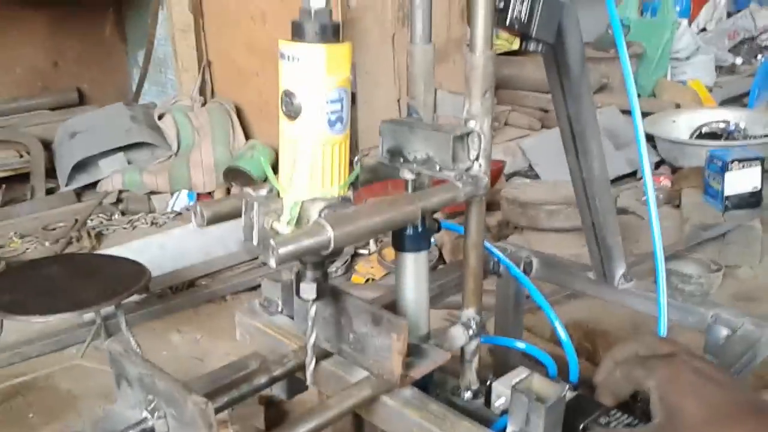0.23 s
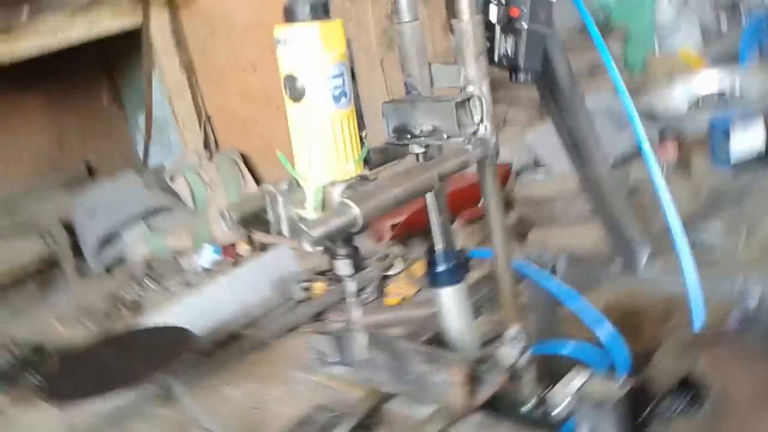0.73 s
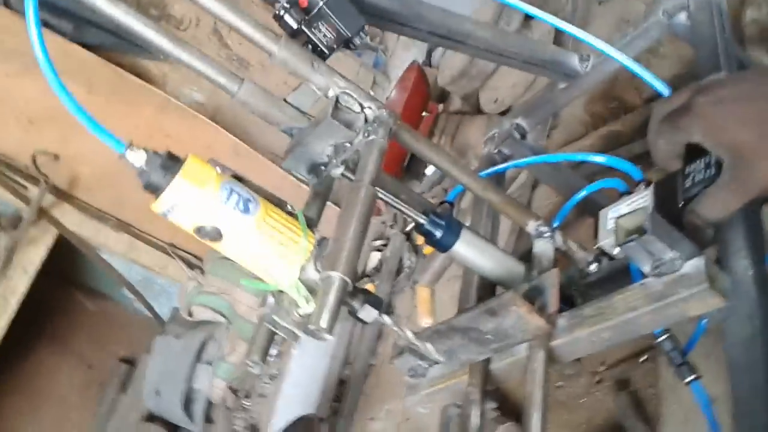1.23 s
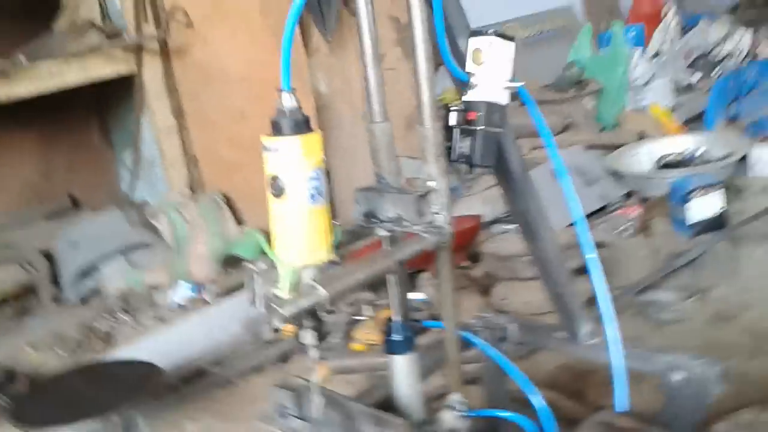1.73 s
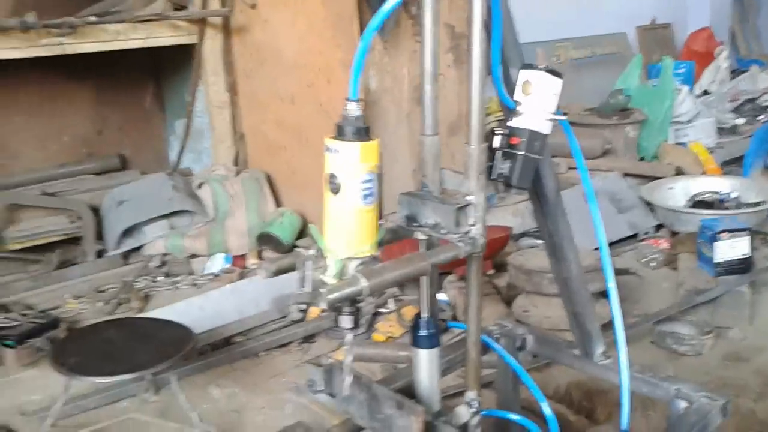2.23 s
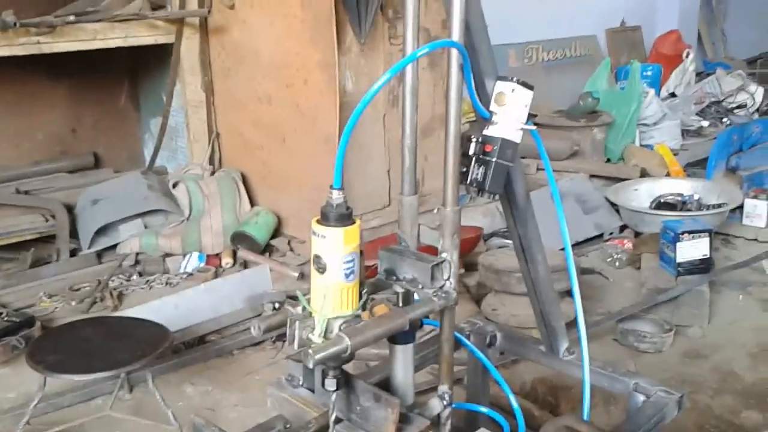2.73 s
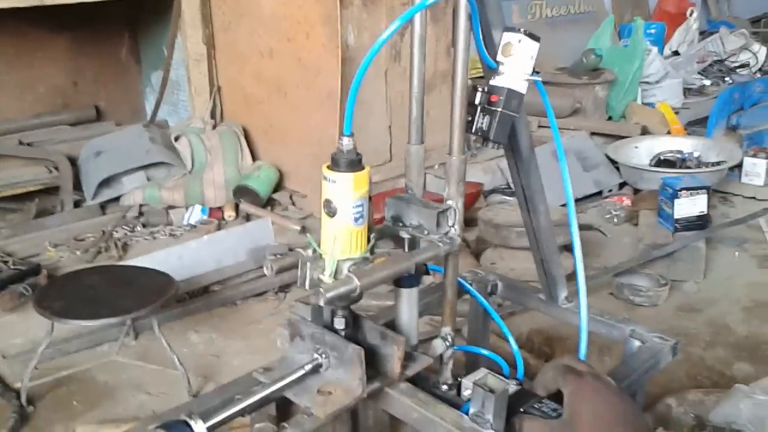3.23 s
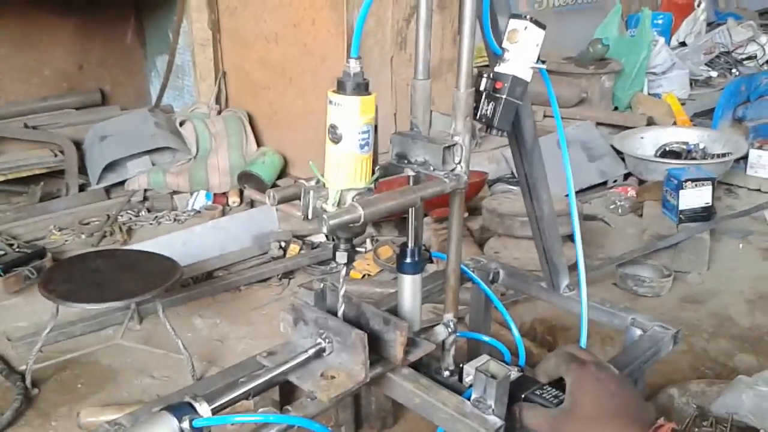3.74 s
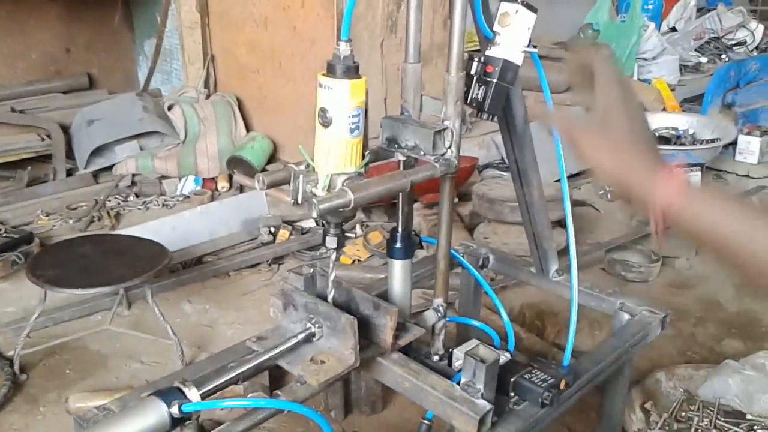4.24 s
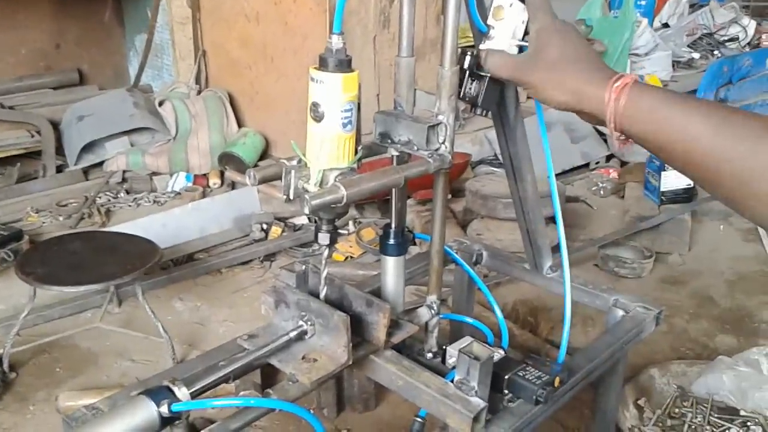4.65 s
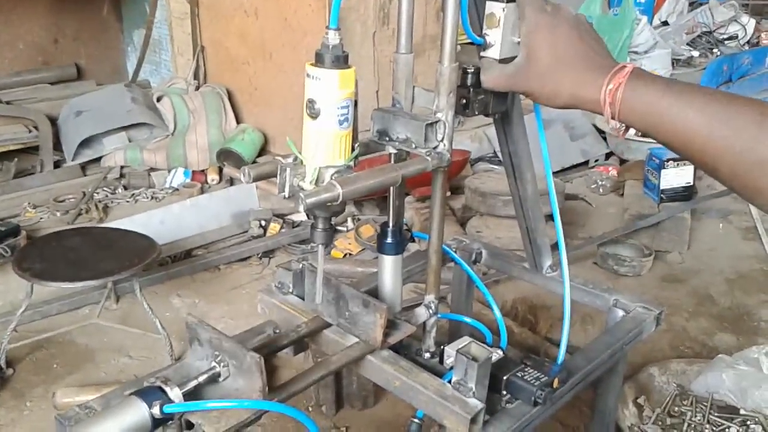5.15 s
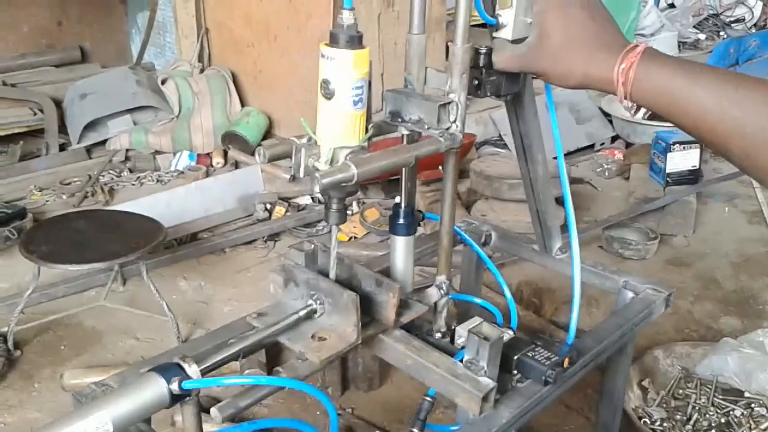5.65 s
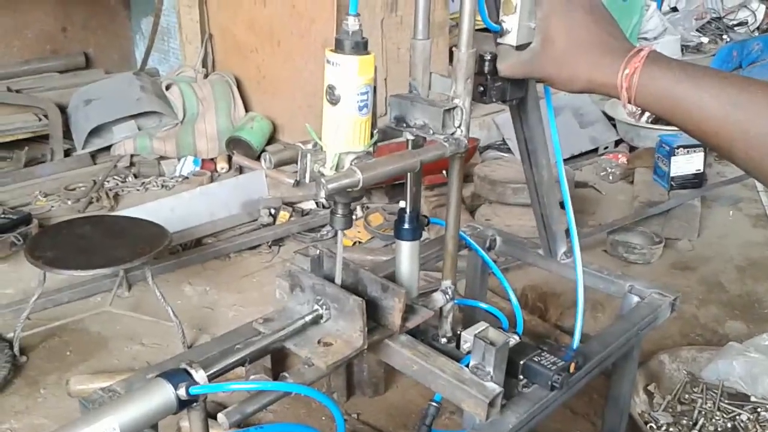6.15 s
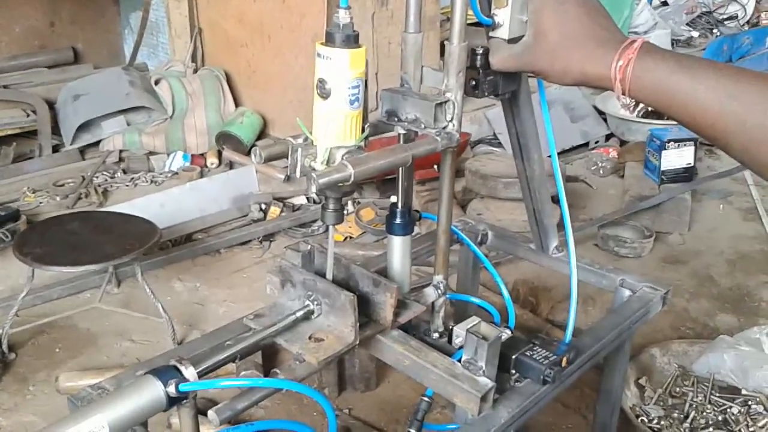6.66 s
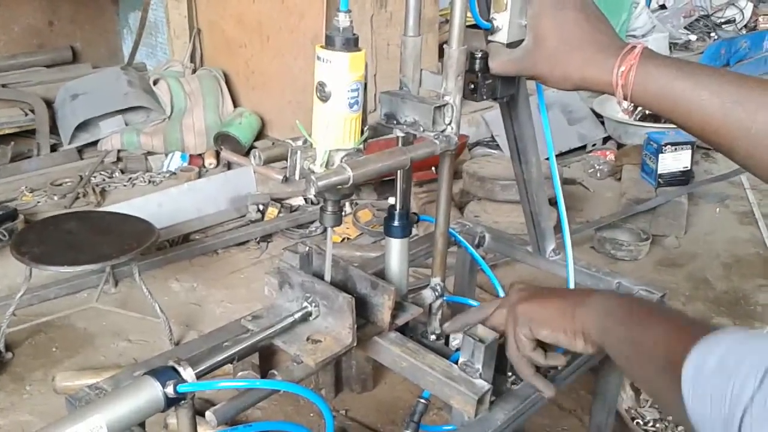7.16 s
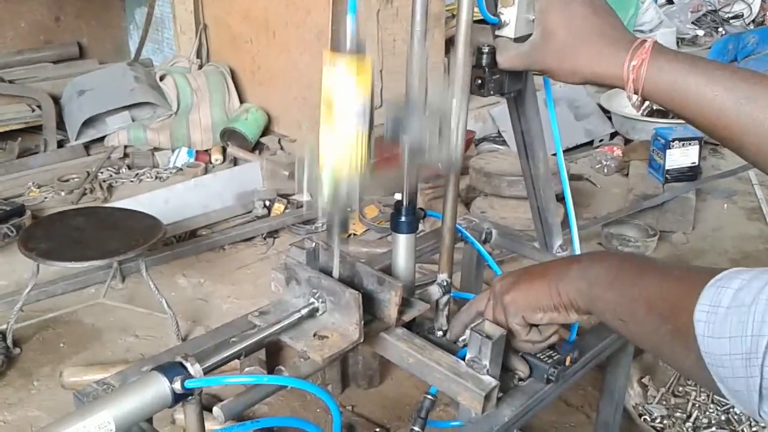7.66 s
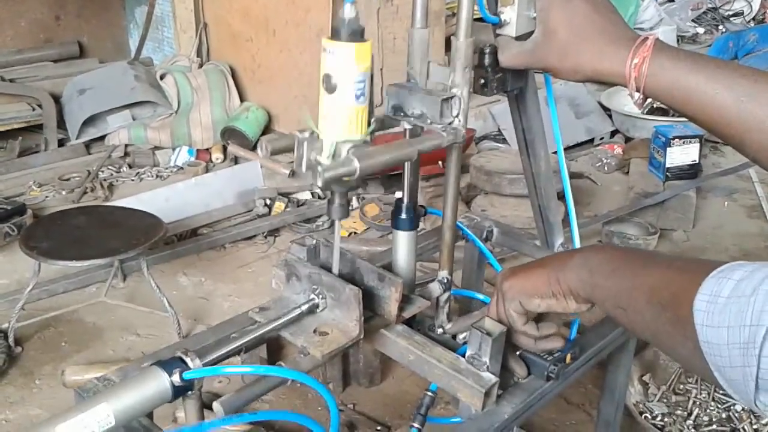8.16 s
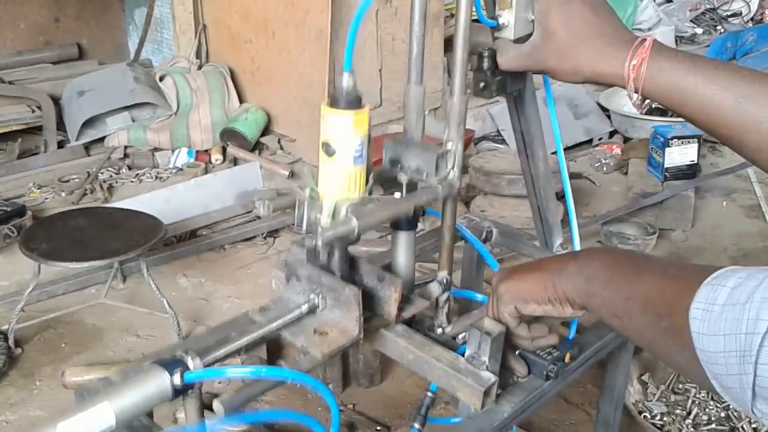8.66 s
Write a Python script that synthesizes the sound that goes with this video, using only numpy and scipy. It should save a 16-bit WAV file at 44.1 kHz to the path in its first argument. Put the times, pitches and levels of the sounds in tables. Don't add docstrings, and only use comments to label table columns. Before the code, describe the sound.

Sharp paired blasts of compressed air with metal knocks over a throbbing distant compressor, then an air drill whines up, stops, and runs on.

```python
import sys
import numpy as np
from scipy import signal
from scipy.fft import rfft, irfft, next_fast_len
from scipy.io import wavfile
from scipy.ndimage import uniform_filter1d

SR = 44100
rng = np.random.default_rng(int(sys.argv[2]) if len(sys.argv) > 2 else 0)


def wrap_up_sound(samples):
    columns = np.atleast_2d(samples).T
    tamed = np.clip(columns, -1, 1)
    steps = np.round(tamed * 32767).astype(np.int16)
    wavfile.write(sys.argv[1], SR, steps)


def elevation(decibels):
    levels = np.asarray(decibels, float)
    return 10 ** (levels / 20)


N = 392049

# start_s, peak_db, first_t60_s, tail_db (under the peak)
VALVE_OPENINGS = [(0.515, 8.5, 0.16, -19.5), (2.4957, 17, 0.11, -27), (3.1153, 2.5, 0.38, -6.5),
                  (3.454, 4.5, 0.18, -12), (4.9441, 11, 0.23, -10.5), (5.674, 2, 0.24, -5),
                  (7.7963, 10.5, 0.099, -14.5), (8.2388, 5.5, 0.083, -16), (8.761, 5.5, 0.06, -11.5)]
# start_s, peak_db, tail_db (under the peak), tail_t60_s, roar_db
CYLINDER_DUMPS = [(-0.1, 4.5, 7, 0.3, -2), (0.5712, 7.5, -7.5, 0.49, -51), (2.5491, 6, -5, 0.41, -26.5),
                  (3.1687, -2, -3.5, 0.47, -23), (3.5113, 2, -6.5, 0.61, -30),
                  (5.0244, 5.5, -12.5, 0.74, -43), (5.726, -1, 0, 0.4, -26), (7.861, -8.5, 4, 0.61, -15.5),
                  (8.322, -2.5, -2.5, 0.52, -27), (8.8249, -7, -2, 0.69, -19)]
# time_s, rotor_hz (turns), vane_load_db
DRILL_RUNS = [
    [(5.04, 209.6, -6), (5.098, 364.4, -3), (5.146, 394, -4), (5.232, 393.6, 1), (5.414, 380.2, -2.5),
     (5.546, 369.7, -2), (5.564, 305, 12), (5.59, 246.5, -13), (5.68, 154, -17)],
    [(5.84, 125.5, -8), (5.896, 234.3, -6), (5.92, 286, 4), (5.958, 260.6, -24), (6.06, 151.5, -35)],
    [(6.14, 121.2, 8), (6.205, 337, 4), (6.255, 394.4, 0.5), (6.31, 411.5, 2), (6.43, 399, 1.5),
     (6.62, 381.8, -0.5), (6.95, 374.6, 0.5), (7.79, 363.1, -1), (8.89, 346.6, 2)],
]


def in_time(rows, off=None):
    time_s, *columns = np.transpose(rows)
    now = np.arange(N) / SR
    return [np.interp(now, time_s, column, off, off) for column in columns]


def rms_one(x):
    return x / np.sqrt(np.mean(x ** 2) + 1e-20)


def coloured(spectrum):
    size = next_fast_len(N)
    hz, db = np.transpose(spectrum)
    log_hz = np.log(np.arange(size // 2 + 1) * SR / size + 1)
    bins = rfft(rng.standard_normal(size)) * elevation(np.interp(log_hz, np.log(hz), db))
    return rms_one(irfft(bins, size)[:N])


def drift(rate_hz):
    r = np.exp(-80 * np.pi * rate_hz / SR)
    noise = rng.standard_normal(N // 40 + 2002)
    slow = signal.lfilter([1], [1, -2 * r, r * r], noise)[2000:]
    return np.interp(np.arange(N) / 40, np.arange(len(slow)), rms_one(slow))


def resonance(x, hz, width_hz):
    r = np.exp(-np.pi * width_hz / SR)
    zeros = np.array([1, 0, -1]) * (1 - r * r) / 2
    return signal.lfilter(zeros, [1, -2 * r * np.cos(2 * np.pi * hz / SR), r * r], x)


def twice_resonant(x, hz, width_hz):
    return resonance(resonance(x, hz, width_hz), hz, width_hz)


def dying(start_s, t60_s, hold_s=0., rise_s=0.00049):
    out = np.zeros(N)
    t60_s = max(t60_s, .01)
    a = max(int(start_s * SR), 0)
    b = max(int((start_s + hold_s + 1.2 * t60_s) * SR), 0)
    age = np.arange(a, min(b, N)) / SR - start_s
    out[a:b] = np.clip(age / rise_s, 0, 1) * elevation(-60 * np.maximum(age - hold_s, 0) / t60_s)
    return out


def swells(rows):
    return sum(elevation(db) * dying(s, t60, hold_s=rise, rise_s=rise) for s, db, rise, t60 in rows)


def blasts():
    # freq_hz, level_db (per Hz)
    jet_spectrum = [(1180, -48), (2000, -45), (2530, -15), (2870, -55), (3210, -18), (4650, -7.5),
                    (4890, -6.5), (5930, 5), (6620, 0), (8040, -10), (15000, -22)]
    tail_spectrum = [(350, -53), (600, -30), (677, -13.5), (1180, -20.5), (1350, -13), (1650, -15),
                     (1810, -14.5), (3320, -9.5), (4520, -5), (5770, 7.5), (7960, -12), (13100, -26.5),
                     (15000, -37)]
    roar_spectrum = [(400, -12.5), (800, -9), (1500, -2.5), (3000, -6.5), (4500, -39)]
    wide_open_s = 0.0072
    rows = [(*row, 0.46, -55) for row in VALVE_OPENINGS]
    rows += [(s, db, 0.14, *rest) for s, db, *rest in CYLINDER_DUMPS]
    burst, tail, roar = np.zeros((3, N))
    for s, db, t60, tail_db, tail_t60, roar_db in rows:
        first = dying(s, t60, hold_s=wide_open_s)
        later = elevation(tail_db) * dying(s, tail_t60, hold_s=wide_open_s)
        burst += elevation(db - 12.5) * first
        tail += elevation(db - 8.5) * later
        roar += elevation(db + roar_db) * (first + 0.16 * later)
    flutter = elevation(1.13 * drift(85))
    return burst * coloured(jet_spectrum) + flutter * tail * coloured(tail_spectrum) + roar * coloured(roar_spectrum)


def air_sag_hz():
    sag_hz, fall_s, recover_s = 17, 0.12, 0.1
    age = np.arange(N) / SR - np.array(VALVE_OPENINGS)[:, :1]
    fall = np.clip(age / fall_s, 0, 1)
    recovery = np.exp(-np.clip(age - fall_s, 0, None) / recover_s)
    return sag_hz * np.sum(fall * recovery, axis=0)


def vane_whine(turn, hz, layers_db, waver):
    multiples = [(1, -21), (2, -4.5), (3, -23), (4, -7.5), (5, -19.5), (6, -19), (7, -23), (8, -6.5),
                 (9, -9), (10, -7.5), (11, -35), (12, 1.5), (13, -10.5), (14, -6.5), (15, -29), (16, -3),
                 (17, -52), (18, -7.5), (19, -12.5), (20, -23), (22, -17), (24, -17.5), (25, -27),
                 (26, -32), (27, -21.5), (28, -24), (29, -29), (30, -37)]
    second_db, fourth_db, tenth_db, twelfth_db = layers_db
    slow = np.clip((345 - hz) / 60, 0, 1)
    whine = 0
    for k, db in multiples + [(k, -31.5) for k in range(31, 39)]:
        if k < 4:
            level_db = second_db
        elif k < 8:
            level_db = fourth_db
        elif k == 10:
            level_db = tenth_db + 8.5 - 8 * slow
        elif k == 12:
            level_db = twelfth_db + 3.5 - 12 * slow
        else:
            level_db = (tenth_db + twelfth_db) / 2 + 5.5 - 10 * slow + 1.75 * waver[k % 7]
        waver_db = (1.1 if k < 4 else 1.9) * waver[(k + 3) % 7]
        whine = whine + elevation(db + level_db + waver_db) * np.sin(k * turn + k * k)
    return whine


def loose_vanes(taps):
    # start_s, level_db, lasts_s, t60_s
    coasting = [
        (5.549, -27, 0.039, 0.57),
        (5.901, -32, 0.073, 0.17),
    ]
    # ring_hz, width_hz, level_db
    vane_rings = [(536, 104, 14), (1420, 73, 13), (1640, 55, 10), (2712, 180, 0)]
    taps = rms_one(taps) * .75 + .6 * rng.standard_normal(N)
    rattle = rms_one(sum(elevation(db) * resonance(taps, hz, width) for hz, width, db in vane_rings))
    return rattle * sum(elevation(db) * dying(s, t60, lasts, rise_s=0.0078) for s, db, lasts, t60 in coasting)


def drill(gain_db):
    # pulled_s, released_s, flow_db
    trigger = [
        (5.04, 5.549, -1),
        (5.84, 5.925, -4),
        (6.147, 9.5, -0.45),
    ]
    # freq_hz, level_db (per Hz)
    exhaust_spectrum = [(150, -40), (400, -10), (1000, -20), (1600, -10), (2400, -16.5), (3000, -8.5),
                        (4800, -7), (5200, 1), (6900, -3.5), (7700, -14.5), (9000, -16), (11000, -21),
                        (13000, -28), (15000, -26)]
    load_shares = (0.2, 0.3, 0.3, 2.6, 0.1)
    # (dB, share of the gain's recovery, power of the speed)
    layers = ((-24.5, 1, 1), (-27, 1.04, 1.2), (-31, 0.6, 1.1), (-42, 1.4, 2.7), (-27, 0.94, 0.12))
    full_speed_hz = 370
    air_off_db, air_dies_s = -25, 0.004
    coast_db, coast_peak_s = 9, 0.016
    housing_hz, housing_width_hz, housing_db = 4440, 123, 9
    surge_db, surge_s = 5, 0.27
    vent_opens_s, vent_off_db, vent_dies_s = 0.02, -11, 0.24
    out, taps = np.zeros((2, N))
    hiss = coloured(exhaust_spectrum)
    waver = np.array([drift(9.0) for k in range(7)])
    grit, sag_hz = drift(86.0), air_sag_hz()
    for run, (pulled, released, flow_db) in zip(DRILL_RUNS, trigger):
        a, b = int(run[0][0] * SR), min(int(run[-1][0] * SR), N)
        now = np.arange(a, b) / SR
        hz, load_db = (column[a:b] for column in in_time(run))
        hz = uniform_filter1d(hz - sag_hz[a:b], size=800)
        speed_db = 20 * np.log10(hz / full_speed_hz)
        second_db, fourth_db, tenth_db, twelfth_db, vent_db = (
            db + share * gain_db[a:b] + power * speed_db + follows * load_db
            for (db, share, power), follows in zip(layers, load_shares))

        since = np.maximum(now - released, 0)
        off_db = air_off_db * (1 - np.exp(-since / air_dies_s))
        second_db = second_db + coast_db * since / coast_peak_s * np.exp(1 - since / coast_peak_s)
        tenth_db = tenth_db + off_db
        detuned = (12 * hz - housing_hz) / housing_width_hz
        twelfth_db = twelfth_db + off_db + housing_db / (1 + detuned ** 2)
        vent_db = vent_db + flow_db + surge_db * np.exp(-np.abs(now - pulled) / surge_s)
        vent_db = vent_db + vent_off_db * (1 - np.exp(-since / vent_dies_s))

        turn = 2 * np.pi * np.cumsum(hz * (1 + 0.00062 * waver[0, a:b])) / SR + 0.004 * grit[a:b]
        whine = vane_whine(turn, hz, (second_db, fourth_db, tenth_db, twelfth_db), waver[:, a:b])
        vent = np.clip((now - pulled) / vent_opens_s, 0, 1) * elevation(vent_db)
        chopped = vent * hiss[a:b] * (1 + 0.22 * np.cos(2 * turn))
        from_ends = np.minimum(np.arange(b - a), np.arange(b - a)[::-1])
        fade = np.clip(from_ends / (0.0048 * SR), 0, 1)
        out[a:b] += fade * (whine + chopped)
        taps[a + 1:b] = np.diff(np.floor(turn / (2 * np.pi)))
    return out + loose_vanes(taps)


def end_stops():
    # start_s, peak_db
    landings = [(0.632, -22.5), (2.608, -27.5), (3.23, -28), (3.578, -22.5), (5.79, -30), (7.933, -22.5),
                (8.4, -27)]
    # ring_hz, level_db, t60_s
    cylinder_rings = [(1110, -6.4, 0.2), (1686, -5.5, 0.24), (2910, -8, 0.14)]
    white = rng.standard_normal(N)
    out = np.zeros(N)
    for hz, ring_db, t60 in cylinder_rings:
        chatter = sum(elevation(db) * dying(s, t60, hold_s=0.0095) for s, db in landings)
        out += elevation(ring_db) * rms_one(resonance(white, hz, 260)) * chatter
    return out


def knocks():
    # start_s, peak_db, ring_hz
    frame_knocks = [(0.515, 0.5, 668), (0.524, -18, 258), (0.575, -7, 1580), (0.632, -9.5, 1540),
                    (2.5, 1.5, 778), (2.609, -32, 1760), (3.229, -17, 1420), (3.455, -7, 312),
                    (3.574, -14, 1550), (4.948, 3.5, 1920), (5.028, -3.5, 288), (5.789, -33, 1430),
                    (7.795, -8, 270), (7.859, -15.5, 1328), (7.933, -14, 734), (8.368, -10, 1540),
                    (8.398, -23, 694)]
    white = rng.standard_normal(N)
    out = np.zeros(N)
    for s, db, hz in frame_knocks:
        out += elevation(db - 8.5) * dying(s, 0.042) * rms_one(resonance(white, hz, 150 + 1.2 * hz))
    return out


def spits():
    # start_s, peak_db, whistle_hz, t60_s
    leak_spits = [(0.4544, -26.5, 6860, 0.69), (1.1653, -35, 9600, 0.25), (1.4494, -27, 7540, 0.25),
                  (1.7794, -21, 7560, 0.3), (1.9654, -23, 7140, 1), (2.054, -16, 8970, 0.39),
                  (2.2614, -16, 7840, 0.56), (2.349, -17, 8650, 0.71), (2.4494, -18.5, 7360, 0.75),
                  (3.0494, -30, 7100, 1), (3.8327, -68, 8250, 0.55), (3.9275, -34, 9500, 0.6),
                  (4.2782, -40, 7190, 0.23), (4.3784, -28, 7000, 0.17), (4.4757, -37, 7500, 0.25),
                  (4.5251, -18.5, 7100, 0.33), (4.7262, -17.5, 7650, 0.18), (4.7694, -21.5, 7800, 0.21),
                  (4.818, -13.5, 7850, 0.67)]
    # freq_hz, level_db (per Hz)
    puff_spectrum = [(350, -53), (600, -30), (677, -13.5), (1180, -20.5), (1350, -13), (1650, -15),
                     (1810, -14.5), (3320, -9.5), (4520, -5), (5770, 7.5), (7960, -12), (13100, -26.5),
                     (15000, -37)]
    white, puff = rng.standard_normal(N), coloured(puff_spectrum)
    out = np.zeros(N)
    for s, db, hz, t60 in leak_spits:
        whistle = rms_one(twice_resonant(white, hz, 960))
        out += elevation(db - 9.5) * dying(s, t60, hold_s=0.012, rise_s=0.0075) * (whistle + 1.93 * puff)
    return out


def compressor_intake(turn):
    stroke_curve = [(0, 1.5), (.1, -.5), (.28, 4), (.4, 2), (.55, -8), (.7, -10), (.82, -5), (1, 1.5)]
    pipe_hz = 214
    tone = np.sqrt(2) * np.sin(2 * np.pi * pipe_hz * np.arange(N) / SR + 1.2 * drift(4.0))
    breath = rms_one(twice_resonant(rng.standard_normal(N), pipe_hz, 84))
    stroke = elevation(np.interp(turn % 1, *np.transpose(stroke_curve)))
    return rms_one(stroke * (tone + .3 * breath))


def shop_noise(turn):
    # freq_hz, level_db (per Hz)
    shop_spectrum = [(25, -39), (60, -15), (160, -7), (360, -17.5), (500, -11), (700, -14), (1300, -18),
                     (3900, -18), (5000, -18), (5800, -10.5), (7000, -20.5), (9000, -29.5), (12000, -41),
                     (15000, -39.5)]
    # ring_hz, width_hz, level_db
    metal_rings = [(101.2, 17, -6), (286, 17.7, 5), (489, 29, 6.5), (520, 8.2, 9), (873, 9.3, 3),
                   (1858, 250, -3.5), (2955, 220, -5.5), (4243, 290, -3.5), (5500, 190, -2.5)]
    white = rng.standard_normal(N)
    rings = rms_one(sum(elevation(db + 2.6 * drift(19.0)) * twice_resonant(white, hz, width)
                        for hz, width, db in metal_rings))
    pulse = elevation(0.25 * np.cos(2 * np.pi * turn - .3) + 0.42 * drift(8.9))
    return (coloured(shop_spectrum) + elevation(-3.5) * rings) * pulse


def workshop(gain_db, gusts):
    # start_s, peak_db, rise_s, t60_s
    noise_swells = [(0.1, -44, 0.047, 0.4), (0.85, -48, 0.041, 0.49), (1.15, -38.5, 0.038, 3.6),
                    (1.7, -34, 0.063, .8), (2.12, -32.5, 0.076, 0.3), (4.6, -31, 0.079, 0.46)]
    strokes_hz = 10.1
    turn = strokes_hz * np.arange(N) / SR + .012 * drift(1.5)
    echo = elevation(-40) * sum(dying(row[0], 0.91, rise_s=0.072) for row in CYLINDER_DUMPS)
    shop_level = elevation(-42.94 + gain_db) + echo + swells(noise_swells) + elevation(-19.5) * gusts
    return elevation(-41.46 + gain_db) * compressor_intake(turn) + shop_level * shop_noise(turn)


def gust_level():
    # start_s, peak_db, rise_s, t60_s
    gust_times = [(0.7, -18, 0.081, 0.52), (1.4, -29.5, 0.13, 5.4), (2.14, -14, 0.052, 1.32),
                  (4.26, -52, .07, 1.5), (4.59, -20.5, .06, 0.34), (4.8, -20, 0.062, .6),
                  (4.98, -16, 0.055, 0.13), (5.56, -25.5, 0.12, .5), (5.84, -33.5, 0.033, 2.5),
                  (6.419, -37, 0.11, 1.9), (7.42, -19.5, 0.2, 1.65), (7.73, -22.5, .04, 0.6)]
    return swells(gust_times)


def wind(gain_db, gusts):
    # freq_hz, level_db (per Hz)
    wind_spectrum = [(30, -37), (60, -42), (120, -4), (250, 1.5), (500, -6), (1000, -9.5), (2500, -17),
                     (6000, -49)]
    breeze = elevation(-56 + 0.38 * gain_db)
    return (gusts + breeze) * elevation(-7 + 3.2 * drift(25)) * coloured(wind_spectrum)


def recovery_db():
    wait_s, rise_s, creep_db_per_s = 0.37, 0.52, 0.89
    quiet_db, drill_db = 17, 8.5
    now = np.arange(N) / SR
    starts = np.sort([row[0] for row in VALVE_OPENINGS + CYLINDER_DUMPS])
    age = now - starts[np.searchsorted(starts, now) - 1] - wait_s
    step = np.clip(age / rise_s, 0, 1)
    reach_db = np.where(now > DRILL_RUNS[0][0][0], drill_db, quiet_db)
    smooth_db = reach_db * step ** 2 * (3 - 2 * step)
    return uniform_filter1d(smooth_db + creep_db_per_s * np.maximum(age, 0), size=400)


def blast_duck():
    rows = VALVE_OPENINGS + CYLINDER_DUMPS
    return elevation(-9 * sum(dying(row[0] - .006, 0.29, hold_s=0.004) for row in rows))


def thinned(x):
    cut_hz, thin_from_hz, thin_to_hz = 15100, 7400, 14300
    hz, _, cells = signal.stft(x, SR, nperseg=2048, noverlap=1536)
    power = np.abs(cells) ** 2 + 1e-20
    patch = uniform_filter1d(uniform_filter1d(power, size=10, axis=0), size=4, axis=1)
    region = uniform_filter1d(uniform_filter1d(power, size=70, axis=0), size=4, axis=1)
    whole = uniform_filter1d(np.mean(power, axis=0), size=4)
    faint = patch < .2 * region ** .75 * (whole + .15 * np.median(whole)) ** .25
    treble = (hz > thin_from_hz) & (hz < thin_to_hz)
    cells[faint & treble[:, None]] = 0
    cells[hz > cut_hz] = 0
    return signal.istft(cells, SR, nperseg=2048, noverlap=1536)[1][:N]


def scene():
    gain_db, gusts, duck = recovery_db(), gust_level(), blast_duck()
    background = workshop(gain_db, gusts) + wind(gain_db, gusts) + spits()
    strikes = blasts() + knocks() + end_stops()
    mono = strikes + duck ** 0.54 * drill(gain_db) + duck * background
    return np.array([mono, mono])


def low_pass(x):
    return signal.sosfilt(signal.butter(12, 16010, fs=SR, output="sos"), x)


def record(dry):
    ceiling = .88
    squashed = dry[0] / (1 + np.abs(dry[0] / ceiling) ** 5) ** (1 / 5)
    mono = np.clip(thinned(squashed), -1.12, 1.12)
    return low_pass(np.array([mono, mono]))


dry = scene()
out = record(dry)
wrap_up_sound(out)
```